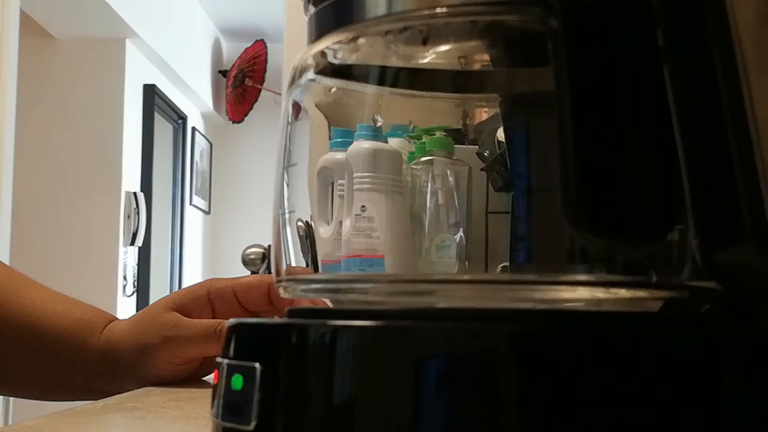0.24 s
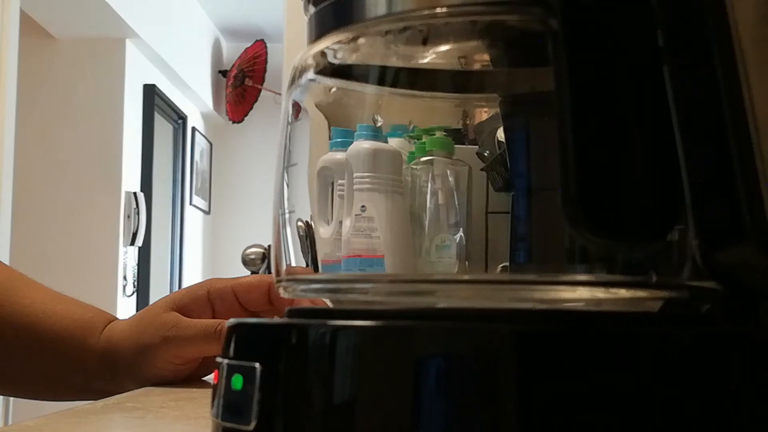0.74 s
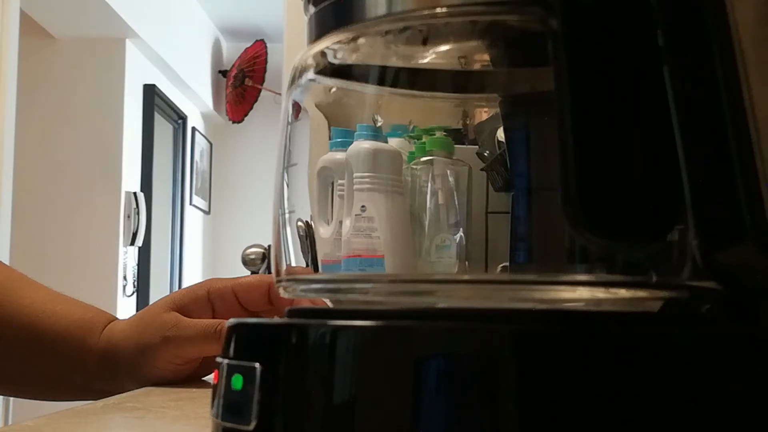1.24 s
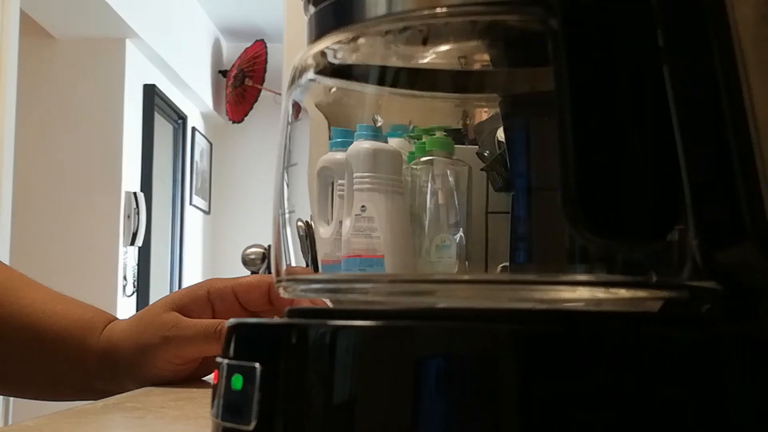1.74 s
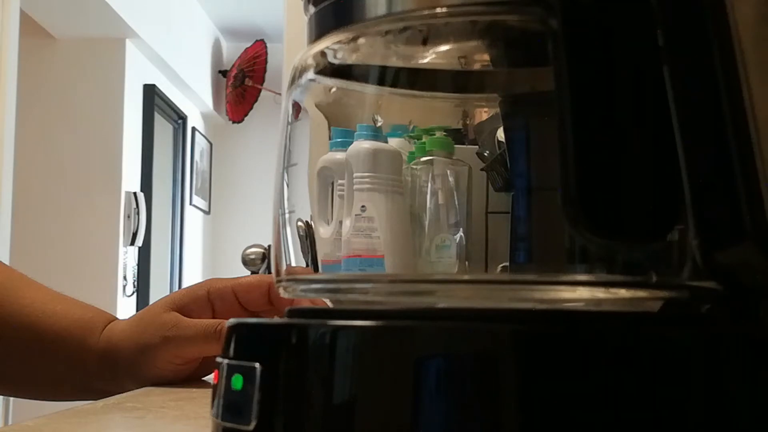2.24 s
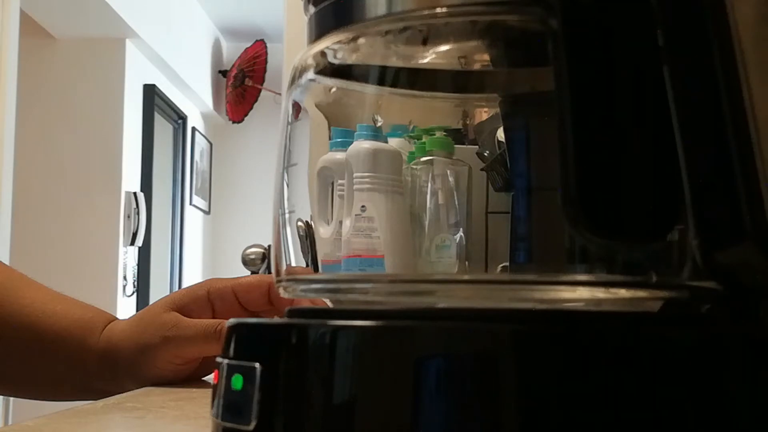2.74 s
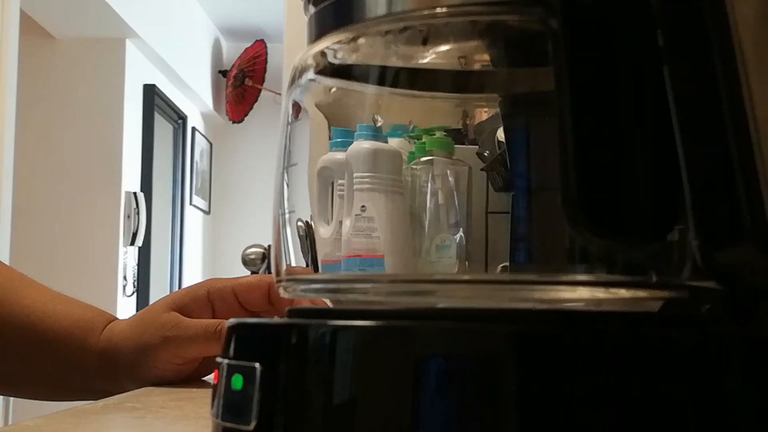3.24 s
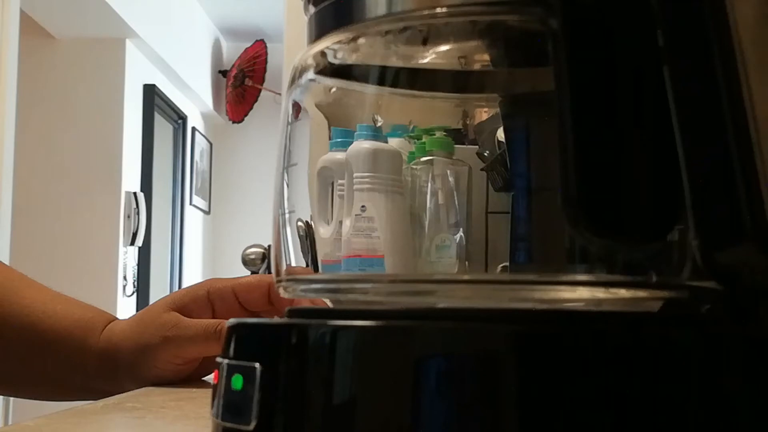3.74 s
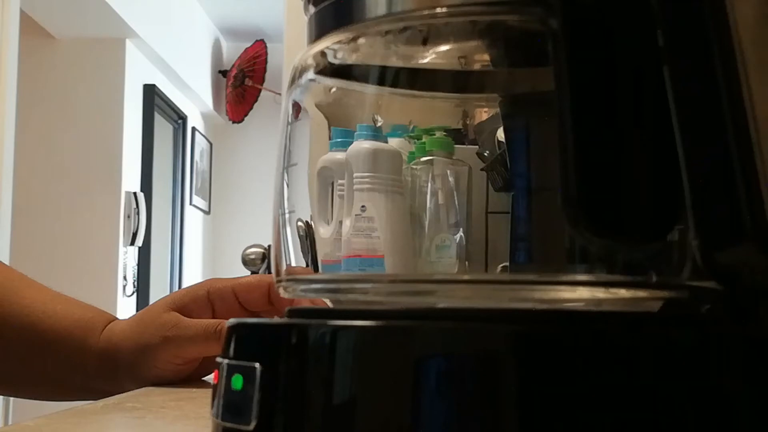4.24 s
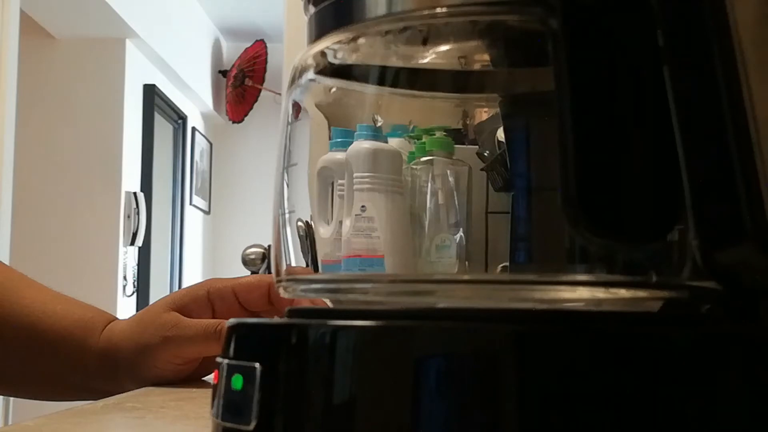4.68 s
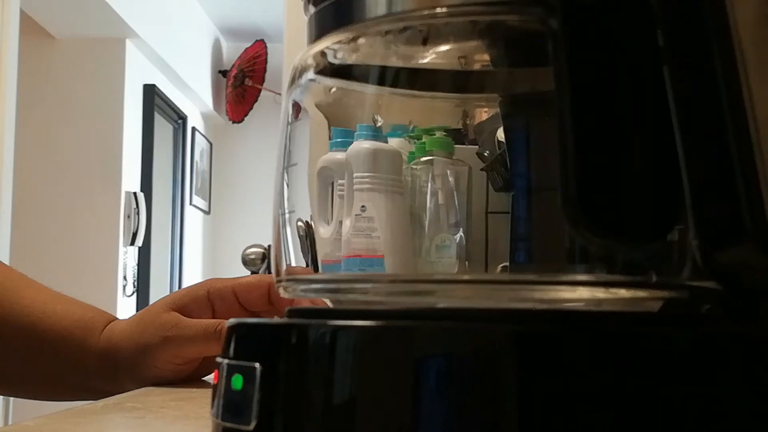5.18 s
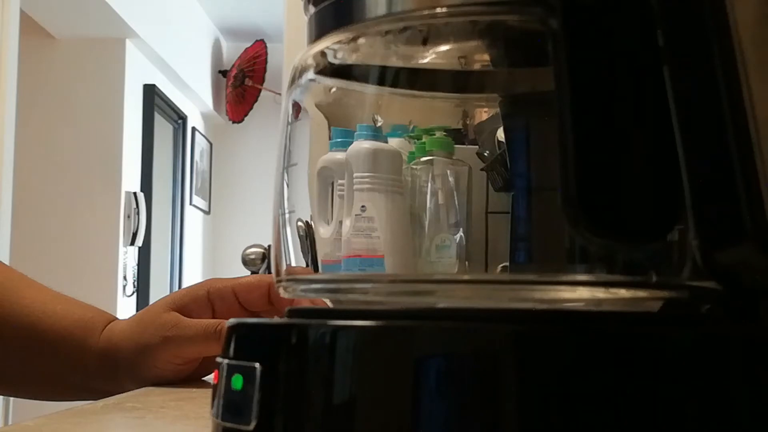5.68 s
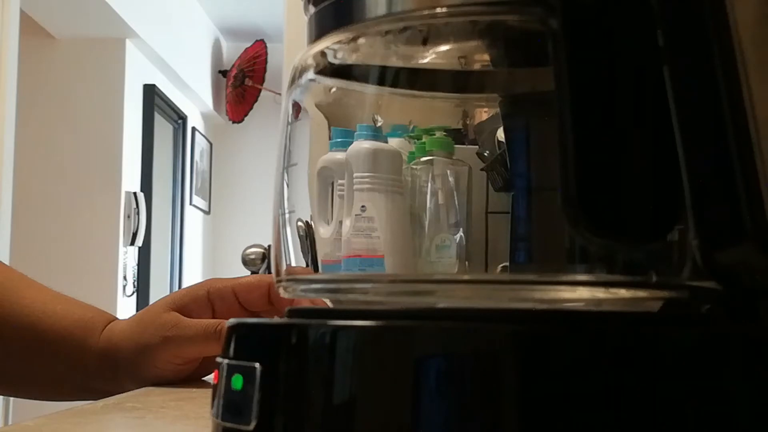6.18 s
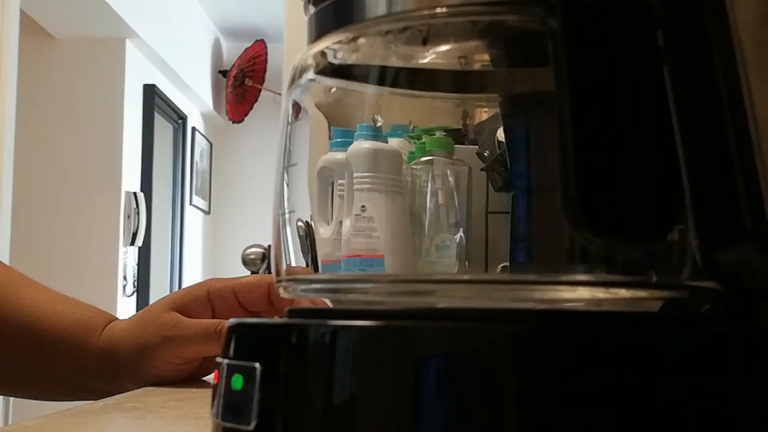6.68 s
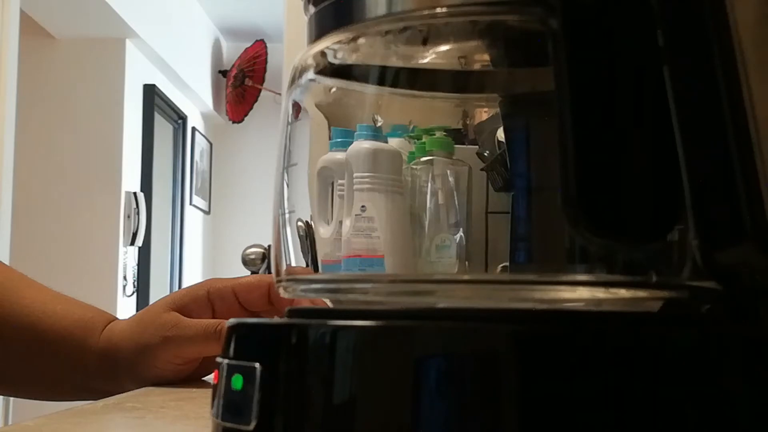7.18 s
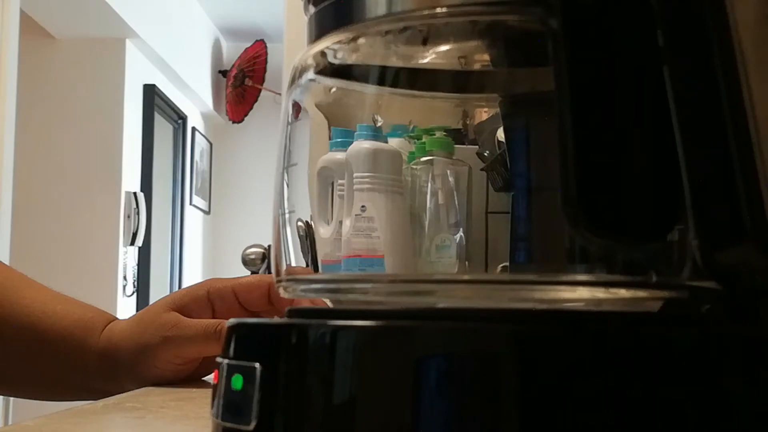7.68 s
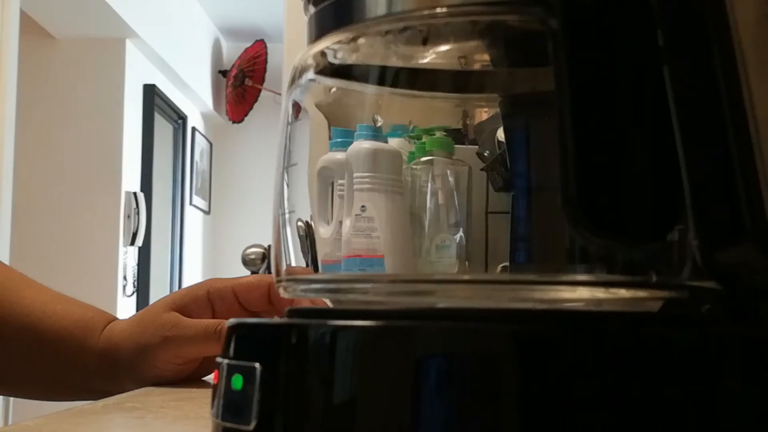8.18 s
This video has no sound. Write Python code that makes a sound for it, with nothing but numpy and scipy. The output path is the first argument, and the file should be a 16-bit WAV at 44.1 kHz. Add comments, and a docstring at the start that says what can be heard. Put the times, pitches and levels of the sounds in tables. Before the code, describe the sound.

Inside a plastic coffee machine, steam pockets collapse as round, low glugs while water slaps and bubbles and steam spits sharply. The activity comes in uneven clusters separated by lulls of soft simmer and thin hiss. Small drops ping with rising pitch, and a tiny glassy knock comes near the end. The microphone is very close, with a short room echo and low wavering hum.

```python
"""Drip coffee maker on a kitchen counter

Heard close by in stereo: steam pockets collapse in the riser tube as low glugs that ring pocket and shell;
slugs of water thump, thrown water splashes as bubble clouds with noise, steam spits as bursts of coloured
noise that break off. Drops ping as short rising tones and the glass jug is knocked once, as a sum of modes.
Random taps echo the machine; behind it lie a simmering murmur, low rumble with a faint, even hiss above it,
and wavering hum tones."""
import sys
import numpy as np
from scipy import signal
from scipy.fft import rfft, irfft, next_fast_len
from scipy.io import wavfile
from scipy.ndimage import uniform_filter1d

SR = 44100
rng = np.random.default_rng(int(sys.argv[2]) if len(sys.argv) > 2 else 0)


def dump(signal):
    """Clip the signal to [-1, 1] and save it as 16-bit WAV at the path in sys.argv[1]."""
    limited = np.clip(np.atleast_2d(signal).T, -1, 1)
    pcm = np.round(limited * 32767).astype(np.int16)
    wavfile.write(sys.argv[1], SR, pcm)


N = 371322  # samples
CALM_DB = -60  # reference level of a calm simmer


def gain_of(db):
    """Level law: an amplitude ratio is 10 to the power of dB / 20."""
    return 10 ** (np.asarray(db) / 20)


def evened(x):
    """Power normalisation: scales the signal to rms 1."""
    return x / np.sqrt(np.mean(x ** 2) + 1e-20)


def read(points, hz):
    """Interpolation on a logarithmic frequency axis."""
    f, value = np.transpose(points)
    return np.interp(np.log(hz + 1), np.log(f + 1), value)


def add(mix, s, sound):
    """Superposition: adds a sound into the mix from time s, in place."""
    part = mix[..., round(s * SR):][..., :sound.shape[-1]]
    part += sound[..., :part.shape[-1]]


def panned_gain(db, left_right_db):
    """Level difference between two channels, shared equally about the mean level."""
    return gain_of(db + np.array([[left_right_db], [-left_right_db]]) / 2)


def resonate(x, hz, width):
    """Time-varying resonance of gain 1: shifts hz to zero, smooths with a one-pole, shifts back."""
    turn = np.exp(2j * np.pi * np.cumsum(hz * np.ones(x.shape[-1])) / SR)
    r = np.exp(-np.pi * width / SR)
    smoothed = signal.lfilter([1 - r], [1, -r], x / turn + 1e-18)
    return 2 * (turn * smoothed).real


def ports(left, other):
    """Interchannel coherence: the right is the left, delayed in phase, blended with a second signal."""
    # hz, left-right likeness (0 to 1)
    likeness = [(60, 1), (150, 1), (300, 0.99), (600, 0.82), (1400, 0.022), (3000, 0.028), (15000, 0.014)]
    # hz, phase_rad by which the left leads
    phase_lead = [(40, 0), (130, .3), (300, .8), (600, 3.2), (1290, 6.5), (2400, 9.6), (15000, 40)]
    # hz, left_right_db
    balance = [(60, -1), (300, 1), (600, -0.5), (1300, -3), (2600, 4.5), (7000, 0), (15000, 0.5)]
    size = next_fast_len(N)
    hz = np.fft.rfftfreq(size, 1 / SR)
    same = np.clip(read(likeness, hz), 0, 1)
    lean = gain_of(read(balance, hz) / 2)
    a, b = rfft(left, size), rfft(other, size)
    right = same * a * np.exp(-1j * read(phase_lead, hz)) + np.sqrt(1 - same ** 2) * b
    return irfft(np.array([a * lean, right / lean]), size)[:, :N]


def noise(spectrum, patchy_db, size=512):
    """Short-time Fourier synthesis: two independent coloured noises that share drifting patches of level."""
    frames = 4 * N // size + 5
    hz = np.fft.rfftfreq(size, 1 / SR)
    a, b, c, d, patches = rng.standard_normal((frames, len(hz), 5)).T
    patches = uniform_filter1d(patches, size=6, axis=0)  # across frequency
    patches = evened(uniform_filter1d(patches, size=10, axis=1))  # across time
    level_db = read(spectrum, hz)[:, None] + patchy_db * patches
    z = np.array([a + 1j * b, c + 1j * d]) * gain_of(level_db)
    return evened(signal.istft(z, nperseg=size, noverlap=size * 3 // 4)[1][:, :N])


def bubbles(spectrum, per_s, cycles, spread_db):
    """Bubble resonance: a random cloud of short, damped, rising tones near favoured pitches."""
    # pitches that the filter basket favours: pitch_hz
    basket = [465, 553.3, 651.7, 840, 985, 1118, 1278, 1360, 1463, 1676, 1922, 2190, 2525]
    t, out = np.arange(2500) / SR, np.zeros(N)
    born = rng.exponential(1, N)
    size = gain_of(spread_db * np.minimum(born, 4)) * (rng.random(N) < per_s / SR)
    pitch = np.outer(basket, [.98, 1.02]).ravel()
    kind = rng.integers(0, len(pitch), N)
    for k, hz in enumerate(pitch):
        envelope = np.exp(-t * hz / cycles) * (1 - np.exp(-t * hz))
        tone = np.sin(2 * np.pi * hz * t * (1 + 1.02 * t)) * envelope
        for at in np.flatnonzero(size * (kind == k)):
            add(out, at / SR, size[at] * hz * gain_of(read(spectrum, hz)) * tone)
    return evened(out)


def simmer(calm_db, slope):
    """Power law between levels: a gain follows the simmer by slope dB per dB."""
    # how hard the water simmers: time_s, level_db
    course = [(0, -69), (.3, -59.5), (.6, -51), (1.3, -48), (1.6, -42.5), (1.9, -64), (3.0, -57),
              (3.4, -50), (3.62, -60), (4.198, -61), (5.56, -61.5), (5.66, -49.5), (5.95, -45.5),
              (6.08, -66.5), (6.34, -58.5), (6.7, -54), (6.95, -60.5), (7.55, -55), (7.74, -64.5),
              (8.42, -57)]
    s, db = np.transpose(course)
    return gain_of(calm_db + slope * (np.interp(np.arange(N) / SR, s, db) - CALM_DB))


def glugs():
    """Impulse excitation: each collapse and its uneven after-bubbles ring the pocket and the shell."""
    # collapsing steam pockets: start_s, level_db, pitch_hz (at the start)
    pockets = [(0.251, -43.5, 158), (0.301, -38, 252), (0.371, -24, 191), (0.375, -22.5, 410),
               (0.418, -37.5, 178), (0.501, -34.5, 161), (0.638, -24, 314), (0.688, -26.5, 251),
               (0.778, -22.5, 233), (0.805, -21.5, 271), (0.881, -20, 262), (0.931, -19.5, 285),
               (0.957, -19.5, 260), (1.068, -20.5, 273), (1.089, -17, 302), (1.139, -18.5, 291),
               (1.395, -23, 280), (1.446, -23.5, 342), (1.489, -25, 272), (1.575, -21, 159),
               (1.585, -18.5, 306), (1.634, -32, 167), (1.615, -29.5, 309), (1.72, -23, 260),
               (1.72, -28.5, 170), (1.79, -28, 286), (2.494, -40.5, 281), (2.555, -29.5, 270),
               (2.658, -32, 355), (2.896, -40, 344), (2.989, -39, 273), (3.05, -35.5, 314),
               (3.114, -26.5, 308), (3.191, -30.5, 289), (3.229, -23.5, 293), (3.322, -13.5, 230),
               (3.346, -21, 219), (3.37, -19.5, 270), (3.409, -30, 140), (3.496, -20.5, 269),
               (3.509, -22.5, 259), (3.65, -30, 233), (3.783, -40, 167), (3.866, -24.5, 284),
               (3.988, -38, 215), (4.115, -41.5, 212), (4.209, -38.5, 222), (4.265, -42, 196),
               (4.328, -44.5, 207), (4.38, -49, 109), (5.615, -39, 201), (5.715, -33, 207),
               (5.794, -30, 211), (5.885, -23, 204), (5.94, -29.5, 132), (6.027, -39.5, 163),
               (6.725, -38, 270), (6.759, -41, 235), (7.332, -11.5, 237.6), (7.357, -25, 237),
               (7.437, -15, 231), (7.455, -23, 213), (7.525, -34.5, 259), (8.059, -35.5, 285)]
    # resonances of the plastic shell: pitch_hz, width_hz, level_db
    housing = [(92.4, 35, -12), (166, 26.4, -5.5), (262, 37, -10), (326.8, 29, -13), (445, 90, -1.5)]
    after_gain, after_t60_s = 0.48, 0.32
    glide_per_s, pocket_width_hz = 0.84, 32.7  # a shrinking pocket rises by this share a second
    slosh, slosh_per_s = 0.056, 6  # moving water shifts the shell's pitch by about this share, this often
    t = np.arange(SR // 3) / SR
    kicks, rings = np.zeros(N), np.zeros(N)
    for (s, db, hz), luck in zip(pockets, rng.random((len(pockets), 2, 60))):
        train = np.zeros(len(t))
        after_s = np.cumsum(.002 + .006 * luck[0])
        train[(after_s * SR).astype(int).clip(0, len(t) - 1)] = after_gain * (2 * luck[1] - 1)
        train[0] = 1  # the collapse itself
        train *= gain_of(db - 60 * t / after_t60_s) * SR / (2 * np.pi)
        rising = hz * (1 + glide_per_s * t)
        pocket = resonate(resonate(train, rising, pocket_width_hz), rising, 210)
        add(rings, s, pocket / 24)
        add(kicks, s, train)
    knots = np.arange(0, N / SR + 1, 1 / slosh_per_s)
    shell = 0
    for hz, width, db in housing:
        drift = np.interp(np.arange(N) / SR, knots, rng.standard_normal(len(knots)))
        moving = hz * (1 + slosh * drift)
        ring = resonate(resonate(kicks, moving, width), moving, 2.53 * width)
        shell = shell + gain_of(db) * ring / width
    both = rings + shell
    return ports(both, np.roll(both, 500))


def thumps():
    """Overdamped impact: a slug of water on the base gives one deep, falling push that dies at once."""
    # slugs of water: start_s, level_db
    slugs = [(0.638, -30.5), (0.779, -30), (0.882, -35.5), (1.069, -34), (1.575, -37), (3.323, -16),
             (3.408, -33), (3.494, -17.5), (3.509, -27), (7.332, -26)]
    t, out = np.arange(SR // 5) / SR, np.zeros(N)
    push = np.sin(2 * np.pi * 110 * t * (1 - 8 * t)) * np.exp(-t / 0.0061) * (1 - np.exp(-t / 0.001))
    for s, db in slugs:
        add(out, s, gain_of(db) * push / abs(push).max())
    return ports(out, out)


def splashes():
    """Two-stage decay: thrown water slaps, then a cloud of bubbles and spray dies away."""
    # splashes of water: start_s, level_db, t60_s (held to at least 0.05)
    throws = [(0.365, -33, 0.75), (0.595, -33.5, 0.29), (0.637, -29, 0.32), (0.658, -31, 0.33),
              (0.777, -33, 0.36), (0.883, -29.5, 0.35), (0.931, -32.5, 0.44), (1.07, -33.5, 0.19),
              (1.102, -31.5, 0.43), (1.39, -29.5, 0.91), (1.48, -23, 0.22), (1.575, -25, 0.13),
              (1.721, -30.5, 0.38), (1.792, -28.5, 0.36), (2.045, -44, 0.18), (2.513, -43, 0.31),
              (2.545, -28, 0.52), (2.648, -28, 0.3), (2.814, -46.5, 0.68), (2.895, -39.5, 0.12),
              (3.113, -22.5, 0.19), (3.16, -25, 0.08), (3.192, -27, 0.23), (3.227, -24.5, 0.13),
              (3.323, -16.5, 0.44), (3.409, -31.5, 0.22), (3.491, -21, 0.27), (3.648, -34.5, 0.23),
              (3.852, -38, 0.35), (4.032, -41.5, 0.26), (4.24, -44.5, 0.25), (5.133, -43.5, 0.081),
              (5.273, -46, 0.091), (5.705, -31, 0.64), (5.842, -34, 0.2), (5.883, -34, 0.4),
              (5.905, -24.5, 0.36), (6.289, -44.5, 0.087), (6.72, -32, 0.45), (7.102, -42.5, 0.044),
              (7.33, -21, 0.37), (7.435, -29, 0.41), (7.523, -32, 1), (8.058, -32.5, 0.23)]
    # colour of the water: hz, level_db (per Hz)
    colour = [(240, -15.5), (400, -2), (677, -3.5), (770, -9), (1160, -11), (2650, -21), (3330, -21),
              (5260, -27), (9970, -29.5), (12000, -35), (15600, -70)]
    t, power = np.arange(SR // 2) / SR, np.zeros(N)
    for s, db, t60 in throws:
        slap = gain_of(-2.5 - 60 * t / 0.058) ** 2
        cloud_fade = gain_of(-6.5 - 60 * t / np.clip(t60, .05, 2)) ** 2
        onset = (1 - np.exp(-t / 0.000096)) ** 2
        add(power, s, gain_of(db) ** 2 * (slap + cloud_fade) * onset)
    cloud = np.array([bubbles(colour, 900, cycles=11.5, spread_db=2.5) for _ in "LR"])
    water = 0.65 * cloud + 0.76 * noise(colour, patchy_db=4.0)
    return ports(*(np.sqrt(power) * water))


def steam():
    """Turbulent jet noise: each spit cracks, hisses with spray, then breaks off; a faint hiss stays."""
    # steam spits: start_s, level_db, length_s (until the hiss breaks off), left_right_db
    spits = [(0.135, -31, 0.1, 0.5), (0.1722, -30, 0.11, -2.5), (0.457, -31, 0.14, 1),
             (0.497, -30, 0.13, -3), (0.6348, -29.5, 0.024, -3), (0.779, -27.5, 0.18, -1),
             (0.935, -30, 0.065, -2), (1.065, -30.5, 0.12, -3), (1.206, -27.5, 0.085, -0.5),
             (1.3515, -31, 0.12, 0), (1.3874, -31.5, 0.12, 3), (1.443, -26, 0.16, -3.5),
             (1.574, -28, 0.048, -3), (1.6615, -26.5, 0.096, 0), (1.792, -33, 0.062, -5),
             (1.955, -30, 0.11, -1), (2.117, -28.5, 0.062, 0), (2.214, -36, 0.024, 4),
             (2.5429, -23, 0.06, 2), (2.6415, -36, 0.045, 8), (3.014, -42, 0.13, 3),
             (3.1146, -32, 0.0091, 14), (3.2248, -28.5, 0.013, 10), (3.326, -29, 0.029, 13),
             (3.349, -22.5, 0.01, 7), (3.425, -34, 0.1, 11.5), (3.489, -40.5, 0.033, 20),
             (3.646, -37.5, 0.0097, 16.5), (3.867, -41.5, 0.062, 11), (3.933, -34.5, 0.027, 2),
             (3.9914, -30, 0.1, 2), (4.0596, -28, 0.07, 1), (4.478, -42.5, 0.027, 3),
             (4.7743, -33.5, 0.072, 1.5), (4.8274, -38.5, 0.18, 1), (5, -38, 0.077, 0),
             (5.0424, -36, 0.059, 2), (5.0893, -31, 0.08, 0), (5.226, -43, 0.04, 0), (5.703, -44, 0.14, 3),
             (5.7967, -37.5, 0.14, 2), (5.91, -31.5, 0.089, 0), (6.53, -41, 0.048, -1),
             (6.715, -34, 0.03, -1), (6.812, -32, 0.088, 1), (7.2898, -31.5, 0.09, 3),
             (7.358, -35, 0.038, 15), (7.5255, -35.5, 0.052, 7), (7.569, -33.5, 0.17, 7)]
    # colour of the jet: hz, level_db (per Hz)
    colour = [(1060, -19.5), (1800, -13.5), (2710, -15.5), (3100, -5), (3660, -1.5), (5710, -6.5),
              (6250, -5.5), (8290, -7), (9850, -3.5), (13900, -15.5), (15200, -28), (15800, -50)]
    t, power = np.arange(SR // 3) / SR, np.zeros((2, N))
    for s, db, length, pan_db in spits:
        crack = gain_of(-5.5 - 60 * t / 0.032) ** 2
        hiss = gain_of(-13.5 - 60 * t / 0.48) ** 2
        break_off = 1 / (1 + np.exp(np.clip((t - length) / 0.0089, -30, 30)))
        shape = (crack + hiss) * break_off * (1 - np.exp(-t / 0.00098)) ** 2
        add(power, s, shape * panned_gain(db, pan_db) ** 2)
    droplets = (rng.random(N) < 150 / SR) * rng.exponential(22, N)
    spray = 1 + 0.29 * uniform_filter1d(droplets, size=40)
    jet = ports(*noise(colour, patchy_db=2.5)) * np.sqrt(power) * evened(spray)
    # a softer, duller hiss beneath the spits
    faint = signal.lfilter([.5, .5], 1, ports(*noise(colour, patchy_db=2.5)))
    return jet + simmer(-64.5, 0.81) * faint + sizzle()


def sizzle():
    """Amplitude-modulated noise: a thin sizzle follows the simmer and swells in stretches of its own."""
    # stretches of thin, high sizzle: start_s, length_s, level_db
    stretches = [(6.35, 0.28, -64), (6.602, 0.11, -58), (7.078, 0.21, -63)]
    # colour of the sizzle: hz, level_db (per Hz)
    colour = [(5000, -40), (7000, -10), (10000, 0), (12500, -8), (16000, -30)]
    edge_s = 0.014  # rise time; the fall takes three times as long
    t, gain = np.arange(N) / SR, simmer(-73.5, 1.3)
    for s, length, db in stretches:
        swell = np.clip(np.minimum(t - s, (s + length - t) / 3) / edge_s, 0, 1)
        gain = gain + gain_of(db) * swell
    return gain * ports(*noise(colour, patchy_db=3.0))


def pings():
    """Damped oscillation: small bubbles sing with rising pitch, and the jug rings once in its modes."""
    # drops that ping: start_s, level_db, pitch_hz (at the start), t60_s, left_right_db
    drops = [(1.395, -30, 1030, 0.072, -17), (1.4, -30, 858, 0.11, -4), (1.72, -37, 1112, 0.28, 1),
             (1.735, -37, 850, 0.22, 0), (2.51, -39, 1390, 0.045, -6), (2.56, -34, 823, .06, -4),
             (3.116, -29, 631, 0.11, 6), (3.125, -40, 1310, 0.084, 0), (3.227, -30.5, 994, 0.079, 0),
             (3.3504, -27, 5580, 0.011, 23), (3.4916, -31.5, 2360, .04, 14),
             (3.492, -33.5, 2870, 0.019, 23), (5.709, -36, 1300, 0.11, -6), (7.437, -34, 655, 0.15, 17),
             (7.53, -41, 1120, 0.05, -9), (8.061, -40, 980, 0.076, -14)]
    # a knock on the glass jug: start_s, peak_db (before panning)
    knocks = [(8.0597, -28)]
    # modes of the jug: pitch_hz, level_db, t60_s
    modes = [(9190, -6, .008), (9535, -2, .006), (10230, -2, .006), (11400, -3, .003)]
    t, out = np.arange(SR // 5) / SR, np.zeros((2, N))
    for s, db, hz, t60, pan_db in drops:
        envelope = gain_of(-60 * t / t60) * (1 - np.exp(-t / 0.00018))
        tone = np.sin(2 * np.pi * hz * t * (1 + 0.34 * t)) * envelope
        tone *= 1 + 0.5 * np.sin(2 * np.pi * (35 * t + rng.random()))  # a close neighbour beats against it
        add(out, s, tone * panned_gain(db, pan_db))
    for s, db in knocks:
        ring = sum(gain_of(a - 60 * t / t60) * np.sin(2 * np.pi * hz * t) for hz, a, t60 in modes)
        ring *= 1 - np.exp(-t / .0004)
        rattle = rng.standard_normal(len(t)) * np.exp(-t / .008)  # the contact rattles for a moment
        ring = signal.fftconvolve(ring, rattle)[:len(t)]
        add(out, s, ring / abs(ring).max() * gain_of(db + np.array([[-5], [4]])))
    return out


def kitchen(x):
    """Reverberation by convolution: taps of random sign die away at a rate set by frequency."""
    taps = np.zeros((2, SR // 2))
    slots = np.arange(200, SR // 2 - 20, 20)
    at = slots + rng.integers(0, 20, (2, len(slots)))
    np.put_along_axis(taps, at, rng.choice([-1., 1.], at.shape), 1)
    hz, t, z = signal.stft(taps, SR, nperseg=256)
    t60_s = read([(200, 0.32), (2000, 0.078), (12000, 0.24)], hz)[:, None]
    tail = signal.istft(z * gain_of(-60 * t / t60_s), SR, nperseg=256)[1]
    tail = tail / np.linalg.norm(tail[0])
    mid = x.mean(0)
    return ports(*signal.fftconvolve(mid[None], tail, axes=1)[:, :N])


def background():
    """Superposed continuous sources: murmur that rises and falls with the simmer, rumble and hum."""
    # colour of the murmur: hz, level_db (per Hz)
    murmur = [(260, -55), (450, 5.5), (497, -27), (532, -5), (707, -7), (924, -8.5), (1240, -5.5),
              (1540, -10), (1720, -8), (2800, -19.5), (3640, -20.5), (6160, -120)]
    # colour of the low rumble and the faint, even hiss above it: hz, level_db (per Hz)
    rumble_and_hiss = [(15, 3.5), (30, 0.5), (60, -13), (170, -18.5), (300, -10.5), (500, -31.5),
                       (800, -37.5), (11000, -35), (13500, -39.5)]
    # wavering hum tones: pitch_hz, width_hz, level_db
    tones = [(98.3, 8.6, -61), (132, 15, -67.5), (1883, 37, -77)]
    drips = bubbles(murmur, 400, cycles=13.0, spread_db=5.0)
    wash = simmer(CALM_DB, 0.85) * (noise(murmur, patchy_db=1.9) + 0.25 * drips)
    wash += gain_of(-54.5) * noise(rumble_and_hiss, patchy_db=0.0, size=4096)
    for hz, width, db in tones:
        waver = rng.standard_normal((2, N))
        waver = evened(resonate(resonate(waver, hz, width), hz, width))
        steady = 1.5 * np.sin(2 * np.pi * hz * np.arange(N) / SR)
        wash += gain_of(db) * evened(waver + steady)
    return ports(*wash)


def scene():
    """Superposition of the machine, its echo and the background."""
    machine = glugs() + thumps() + splashes() + steam() + pings()
    return machine + gain_of(-3.5) * kitchen(machine) + background()


def record(dry):
    """Band limitation: a linear-phase low-pass at 15800 Hz."""
    lowpass = signal.firwin(511, 15800, window=("kaiser", 9), fs=SR)
    return signal.oaconvolve(dry, lowpass[None], "same")


dry = scene()
out = record(dry)
dump(out)
```